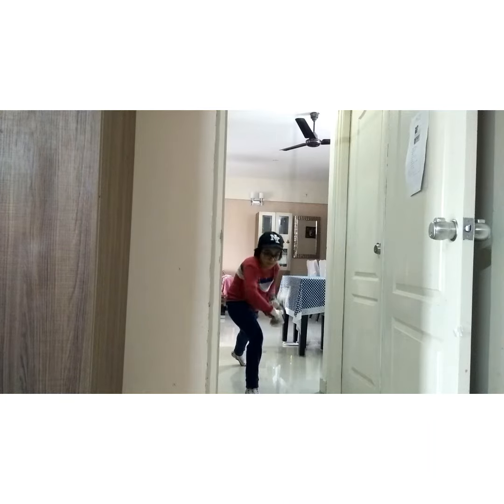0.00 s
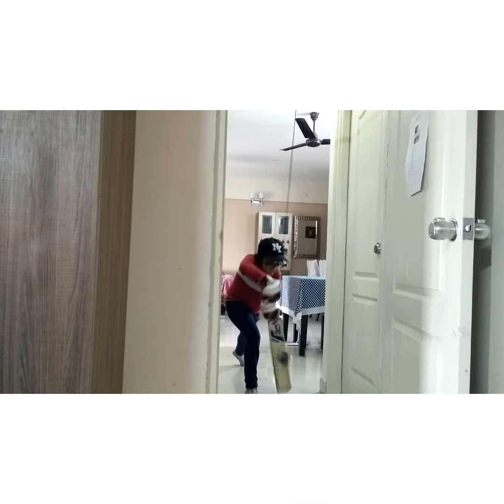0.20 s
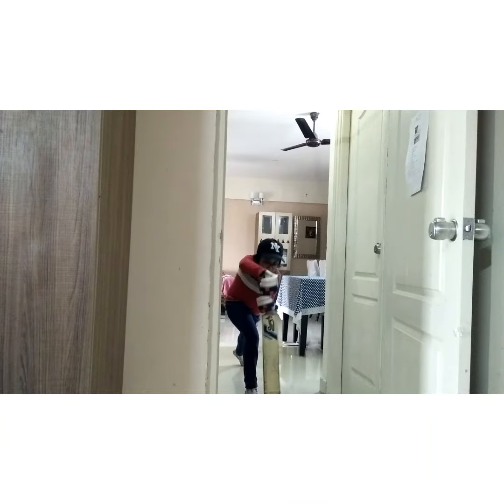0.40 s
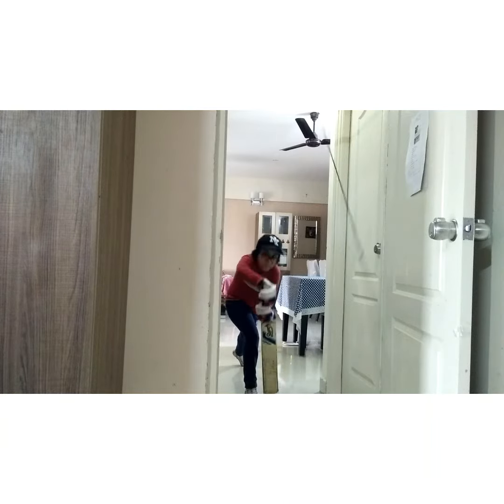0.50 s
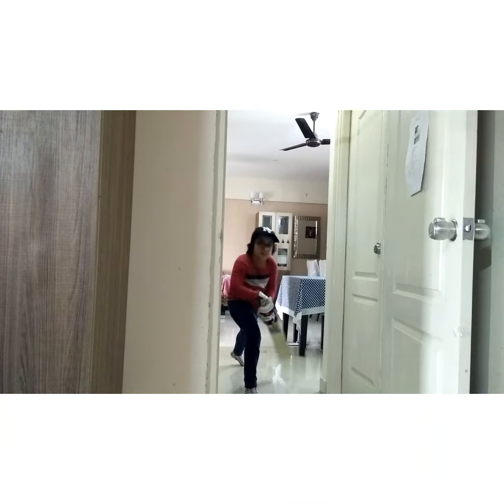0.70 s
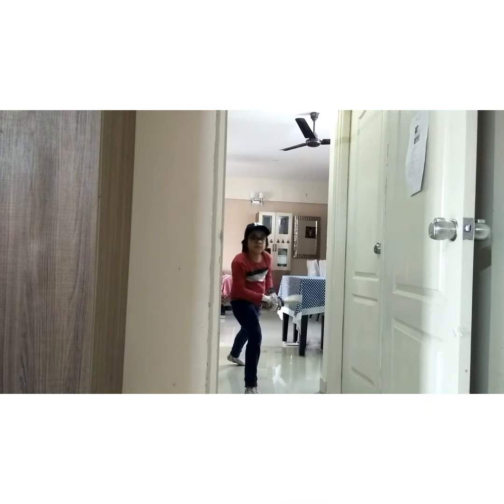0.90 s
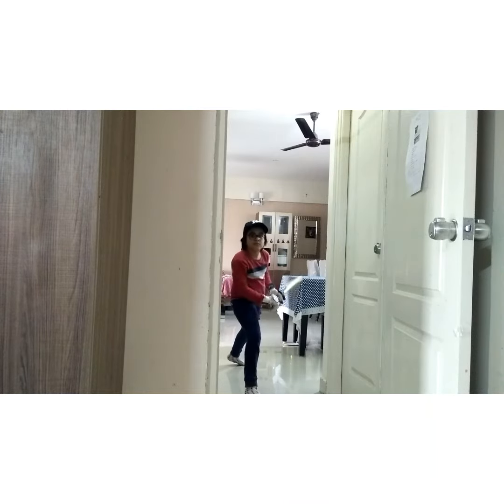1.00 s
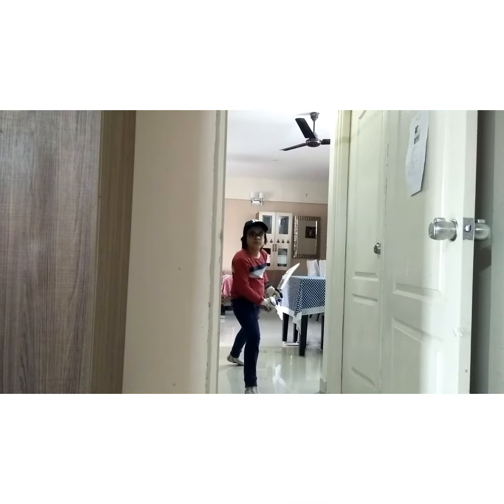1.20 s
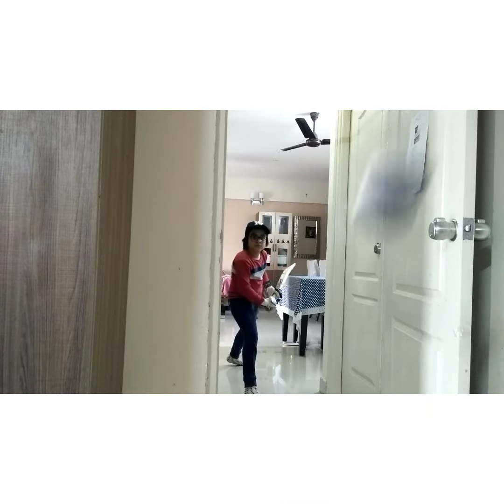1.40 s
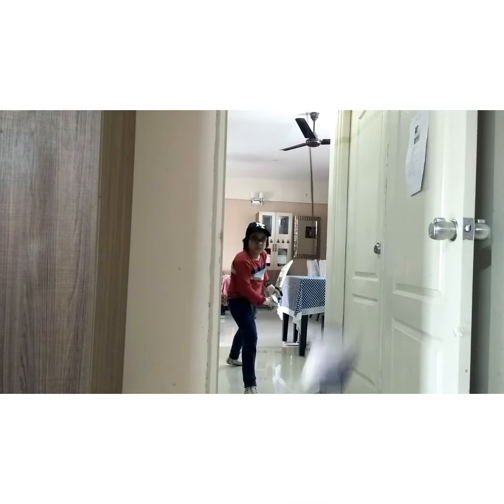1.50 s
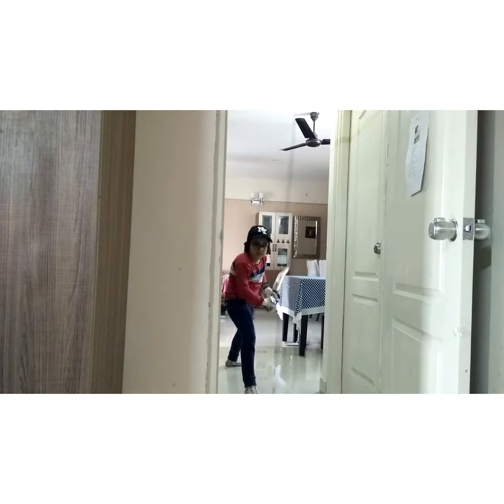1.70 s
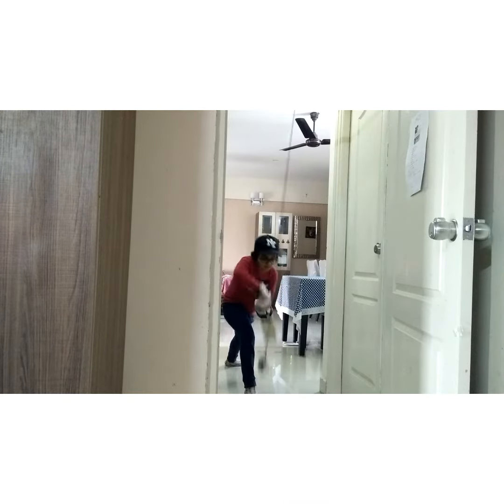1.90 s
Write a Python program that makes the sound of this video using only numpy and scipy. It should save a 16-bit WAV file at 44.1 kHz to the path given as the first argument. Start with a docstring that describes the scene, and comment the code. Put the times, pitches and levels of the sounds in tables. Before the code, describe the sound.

A wooden cricket bat strikes a hanging ball once at about 0.25 s: a loud, sharp click and crack with a short hollow ring, brighter to the right. Quick echoes and a hard-room tail fade by about 0.9 s. Faint scuffs follow at 0.47, 0.67 and 0.8 s, then soft shuffling near 1.5 and 1.75 s. Quiet low rumble, hiss and a very thin high whine run throughout.

```python
"""A hard-floored room, heard through a doorway: a wooden cricket bat strikes a hanging ball once.
The knock is a click, a short push, a noise crack and quickly damped bat modes; delayed copies are its near echoes.
Banded decaying noise and standing waves ring the room out. The batter shuffles faintly in filtered noise, with
brief scuffs after the blow. Low rumble and hiss, also filtered noise, and a thin sine whine run throughout."""
import sys
import numpy as np
from scipy import signal
from scipy.fft import rfft, irfft, next_fast_len
from scipy.io import wavfile

SR = 44100
rng = np.random.default_rng(int(sys.argv[2]) if len(sys.argv) > 2 else 0)


def bounce(signal):
    """Save signal as a 16-bit WAV file at the path given by the first command-line argument."""
    frames = np.transpose(np.atleast_2d(signal))
    limited = np.clip(frames, -1, 1)
    pcm = np.round(limited * 32767).astype(np.int16)
    wavfile.write(sys.argv[1], SR, pcm)


N = 83790
T = np.arange(N) / SR  # seconds
CUTOFF_HZ = 16800  # top of the audible band


def from_db(db):
    """Turn decibels into an amplitude gain."""
    return 10 ** (np.asarray(db) / 20)


def rms_one(x):
    """Scale to unit rms."""
    return x / np.sqrt(np.mean(x ** 2) + 1e-20)


def at_hz(points, hz):
    """Read a table of (Hz, value) on a log-frequency axis."""
    table_hz, values = np.array(points).T
    return np.interp(np.log(hz + 1e-9), np.log(table_hz), values)


def delayed(x, seconds):
    """The same sound, later by the travel or waiting time."""
    silence = np.zeros(max(int(seconds * SR), 0))
    return np.concatenate([silence, x])[:N]


def dying(t60):
    """Exponential decay that falls 60 dB in t60 seconds."""
    return from_db(-60 * T / t60)


def building(rise_s):
    """Exponential approach from silence to full level."""
    return 1 - np.exp(-T / rise_s)


def filtered(x, order, hz, kind):
    """Butterworth filter."""
    return signal.sosfilt(signal.butter(order, hz, kind, fs=SR, output="sos"), x)


def coloured(x, points):
    """Causal (minimum-phase) filter that follows a table of (Hz, dB)."""
    size = next_fast_len(2 * N)
    gain = from_db(at_hz(points, np.fft.rfftfreq(size, 1 / SR)))
    cepstrum = irfft(np.log(gain), size)
    # folding the cepstrum onto positive time makes the filter causal
    cepstrum[1:size // 2] *= 2
    cepstrum[size // 2 + 1:] = 0
    response = np.exp(rfft(cepstrum))
    return irfft(rfft(x, size) * response, size)[..., :N]


def shaped(noise, points):
    """Colour white noise and keep its power."""
    gain = from_db(at_hz(points, np.fft.rfftfreq(N, 1 / SR)))
    return coloured(noise, points) / np.sqrt(np.mean(gain ** 2))


# Likeness of the left and right microphones. Each row: frequency in Hz, correlation from 0 to 1.
LIKENESS = [(100, 1), (300, 0.77), (600, 0.65), (1100, 0), (2200, 0), (15000, 0)]


def diffuse(t60s=None, count=20):
    """White stereo noise, alike in the bass; with a table of decay times each band dies away."""
    mid, side = rfft(rng.standard_normal((2, N)))
    hz = np.fft.rfftfreq(N, 1 / SR)
    alike = np.clip(at_hz(LIKENESS, hz), -1, 1)
    common = np.sqrt(1 + alike) * mid
    opposed = np.sqrt(1 - alike) * side * [[1], [-1]]
    both = (common + opposed) / np.sqrt(2)
    if t60s is None:
        return irfft(both, N)
    centres = np.geomspace(50, CUTOFF_HZ, count)
    out = np.zeros((2, N))
    for centre, pick in zip(centres, np.eye(count)):
        share = np.interp(hz, centres, pick)  # overlapping triangular bands
        out += irfft(both * share, N) * dying(at_hz(t60s, centre))
    return out


def ringing(modes):
    """Damped sines set off together, from rows of (Hz, dB, t60 in s)."""
    return sum(from_db(db) * dying(t60) * np.sin(2 * np.pi * hz * T) for hz, db, t60 in modes)


# Colour of the room's steady rumble and hiss. Each row: frequency in Hz, relative density in dB per Hz.
AMBIENCE_COLOUR = [(28, -22), (48, 2), (100, -1), (220, -5.5), (500, -9), (1000, -20), (2300, -26),
                   (3400, -24.5), (5000, -26), (6800, -21), (9000, -29.5), (15500, -26.5)]
AMBIENCE_DB, HISS_LEFT_DB = -62.5, -4  # right microphone's rms, and the left relative to it
WHINE_HZ, WHINE_DB = 7020, -79.5


def background():
    """Steady rumble and hiss from coloured noise, with a thin sine whine on the right."""
    whine = from_db(WHINE_DB) * rms_one(np.sin(2 * np.pi * WHINE_HZ * T))
    left, right = from_db(AMBIENCE_DB) * shaped(diffuse(), AMBIENCE_COLOUR)
    return np.array([from_db(HISS_LEFT_DB) * left, right + whine])


# The batter's low shuffling, before the left shade. Each row: time in seconds, level in dB.
SHUFFLE_LEVEL = [(0, -64), (.15, -65.5), (.5, -69), (1.18, -74.5), (1.3, -66.5), (1.45, -66), (1.62, -65.5),
                 (1.8, -62), (1.9, -66)]
# Colour of that shuffling. Each row: frequency in Hz, relative density in dB per Hz.
SHUFFLE_COLOUR = [(35, -21), (75, 1.5), (220, -2.5), (500, -12.5), (1500, -19), (4000, -33), (15000, -38)]


def shuffling():
    """Low, wide noise whose level wanders as the batter moves."""
    level_db = np.interp(T, *np.transpose(SHUFFLE_LEVEL))
    return from_db(level_db) * shaped(diffuse(), SHUFFLE_COLOUR)


# Colour of the crack and click, before the treble lift. Each row: frequency in Hz, relative density in dB per Hz.
CRACK_COLOUR = [(800, 13.5), (2000, -4.5), (3200, -6.5), (5000, -2.5), (7500, -2), (10000, -15.5),
                (15000, -26.5)]
# Modes of bat and ball. Each row: frequency in Hz, level in dB before build-up and filters, t60 in seconds.
BAT_MODES = [(148.3, -11.5, .1), (225.8, -14.5, 0.19), (361.3, -19, .18), (446.6, -15.5, .22),
             (592.8, -20, 0.48), (624.2, -14.5, 0.25), (698, -20, 0.24), (769.5, -17.5, .22),
             (1043, -26, .16), (1471, -30.5, 0.15), (1488, -32, 0.096)]
# Near echoes from floor, door and walls. Each row: delay in seconds, level in dB against the direct snap.
ECHOES = [(.0013, -6), (.0085, -10.5), (0.0144, -4.5), (0.0414, -13)]
# Levels here come before the treble lift and the left shade
PUSH_DB, PUSH_LOW_HZ, PUSH_HIGH_HZ = 13, 89, 1090  # the push lies mainly between these corners
CLICK_DB = 5  # the first instant of contact
CRACK_DB, CRACK_T60_S = -5.5, 0.012
WOOD_RISE_S = 0.0017  # the ring builds up as the walls add to it
WOOD_LEFT_DB = -3.5  # the bat's own ring comes more from the right than the room does


def knock():
    """Bat meets ball: a click, a push, a brief crack and the wooden ring, followed by the first echoes."""
    impulse = signal.unit_impulse(N) + 1e-18
    push = filtered(impulse, 1, PUSH_HIGH_HZ, "low")
    push = from_db(PUSH_DB) * filtered(push, 2, PUSH_LOW_HZ, "high")
    click = from_db(CLICK_DB) * coloured(impulse, CRACK_COLOUR)
    burst = rng.standard_normal(N) * dying(CRACK_T60_S)
    crack = from_db(CRACK_DB) * shaped(burst, CRACK_COLOUR)
    snap = crack - click - push
    wood = ringing(BAT_MODES) * building(WOOD_RISE_S)
    wood = np.array([from_db(WOOD_LEFT_DB) * wood, wood])
    echoes = sum(from_db(db) * delayed(snap, delay_s) for delay_s, db in ECHOES)
    return snap + wood + echoes


# Colour of the reverberation, before the treble lift. Each row: frequency in Hz, relative density in dB per Hz.
TAIL_COLOUR = [(30, -41), (80, -19), (180, -8), (300, -9), (440, -6), (720, -2), (950, -9), (1220, -19.5),
               (1520, -14.5), (2300, -19.5), (3000, -23.5), (4600, -22.5), (6800, -18), (9000, -24),
               (11000, -37), (15500, -39.5)]
# Reverberation time of the tail. Each row: frequency in Hz, t60 in seconds.
ROOM_T60 = [(60, 1), (250, 0.7), (700, 0.63), (1500, 0.63), (3000, 0.52), (7000, 0.49), (9500, 0.44),
            (14000, 0.3)]
# Standing waves. Each row: frequency in Hz, level in dB before build-up and filters, t60 in seconds.
ROOM_MODES = [(77, -30.5, .42), (123.5, -36, 0.3), (199.3, -30.5, 0.68), (254, -38, 1.2), (364, -34.5, .5),
              (376.8, -34, 1.1), (447.6, -27, 0.67), (543, -30.5, 0.57), (665, -30, 0.41), (703, -35, 0.78),
              (740, -20.5, 0.35), (757, -36.5, .65), (928, -43, .65), (1130, -54, .85), (1443, -46, .5)]
TAIL_DB, TAIL_RISE_S = -17.5, 0.0016  # level before the filters, build-up of the whole answer
SCATTER_DB, SCATTER_T60_S = -14, 0.24  # level before the filters


def room():
    """The room's answer: quick scatter, a long tail and standing waves."""
    scatter = from_db(SCATTER_DB) * diffuse() * dying(SCATTER_T60_S)
    tail = from_db(TAIL_DB) * diffuse(ROOM_T60)
    reverberation = shaped(scatter + tail, TAIL_COLOUR)
    return (reverberation + ringing(ROOM_MODES)) * building(TAIL_RISE_S)


# Resonances the crack keeps through its echoes. Each row: frequency in Hz, width in Hz,
# boost in dB (below zero is a dip).
CRACK_PEAKS = [(1510, 110, 5), (2340, 350, 3), (3400, 140, 4.5), (4000, 250, 2), (4600, 150, -1.5),
               (5950, 350, 3.5), (6595, 64, 2), (7040, 87, 5), (7530, 110, 5), (9250, 280, 5.5),
               (11000, 450, 4.5), (13200, 300, 1.5)]


def bright(x):
    """Colour the blow with narrow treble resonances, mostly lifts."""
    out = x
    for hz, width_hz, db in CRACK_PEAKS:
        resonance = signal.lfilter(*signal.iirpeak(hz, hz / width_hz, fs=SR), x)
        out = out + (from_db(db) - 1) * resonance
    return out


# Faint scuffs of shoes and clothes. Each row: start in seconds, level in dB before the envelope and left shade,
# rise in seconds, t60 in seconds, centre in Hz, reach to each side as a share of the centre.
SCUFFS = [(.465, -58, 0.0081, .2, 9900, .3), (.674, -61.5, 0.0046, 0.084, 3680, 0.052),
          (.67, -65.5, 0.0047, 0.3, 8850, 0.13), (.815, -61, 0.01, .25, 7200, .25),
          (.815, -69, 0.0038, 0.15, 3550, 0.12), (1.472, -66, 0.0089, .25, 1200, 0.27),
          (1.735, -57, 0.026, .3, 7120, 0.27)]


def scuffs():
    """Brief, soft rubs: band-passed noise that swells fast and dies away."""
    out = np.zeros((2, N))
    for start_s, db, rise_s, t60, hz, width in SCUFFS:
        edges = np.clip([hz / (1 + width), hz * (1 + width)], 20, SR / 2 - 10)
        rub = rms_one(filtered(rng.standard_normal((2, N)), 2, edges, "band"))
        envelope = delayed(dying(t60) * building(rise_s), start_s)
        out += from_db(db) * rub * envelope
    return out


# How much of the blow and the batter's movement reaches the left microphone. Each row: frequency in Hz, gain in dB.
LEFT_SHADE = [(60, -2.5), (250, -2), (480, -1), (680, -5), (1200, -7), (2700, -3.5), (3700, -1),
              (5000, -16.5), (6200, -32.5), (8500, -28), (12000, -15.5), (15500, -21)]
HIT_S, LEFT_LAG_S = 0.2466, 0.0001  # the left microphone is a little farther away
LOW_CUT_HZ = 29  # the microphones' bass roll-off on the blow


def scene():
    """One stroke in the room; the left microphone is shaded from the blow and the batter."""
    blow = filtered(bright(knock() + room()), 2, LOW_CUT_HZ, "high")
    arrived = np.array([delayed(blow[0], HIT_S + LEFT_LAG_S), delayed(blow[1], HIT_S)])
    left, right = arrived + shuffling() + scuffs()
    return np.array([coloured(left, LEFT_SHADE), right]) + background()


def record(dry):
    """Clip the peaks just under full scale, then cut the top with a steep low-pass."""
    clipped = np.clip(dry, -.88, .88)
    return signal.sosfilt(signal.cheby2(12, 60, CUTOFF_HZ, fs=SR, output="sos"), clipped)


dry = scene()
out = record(dry)
bounce(out)
```